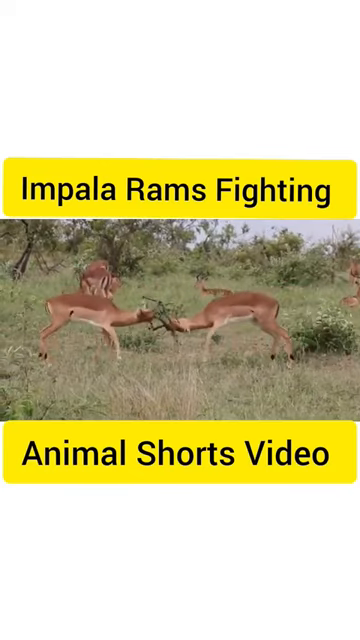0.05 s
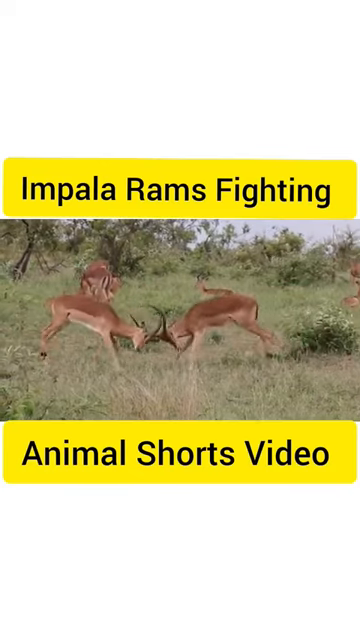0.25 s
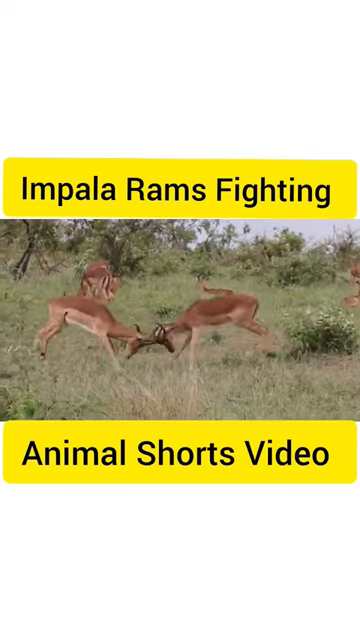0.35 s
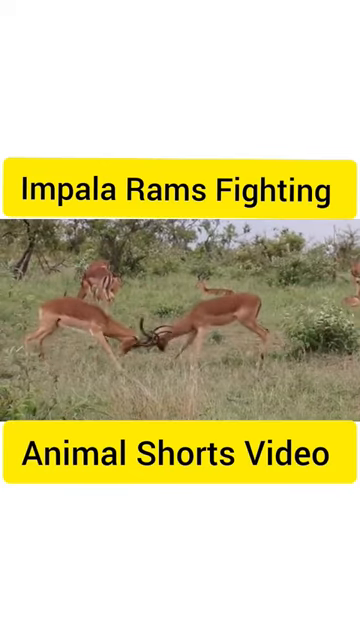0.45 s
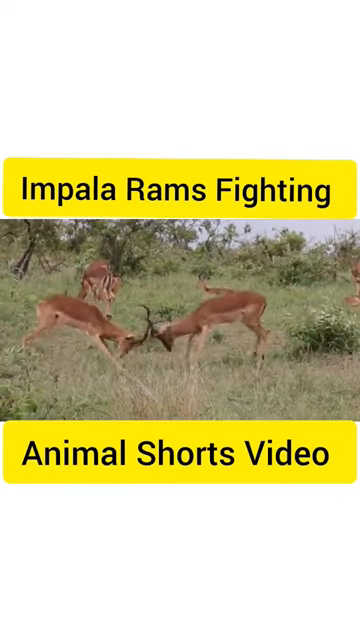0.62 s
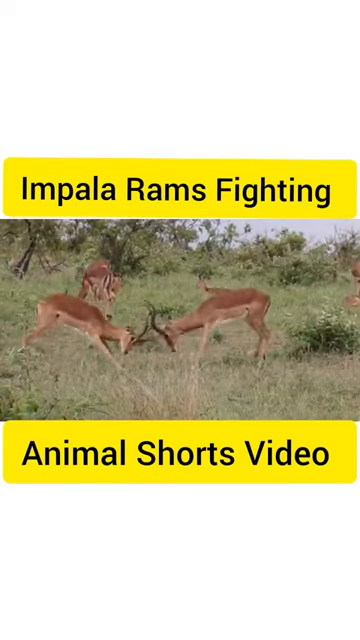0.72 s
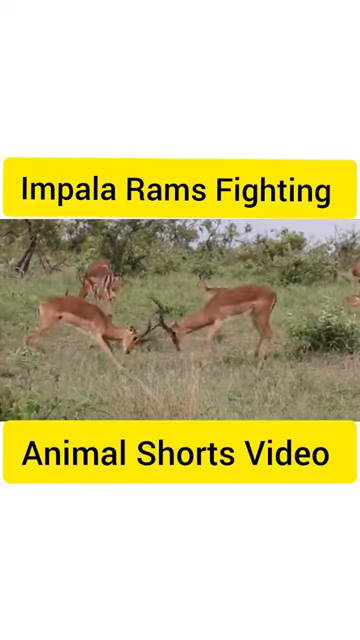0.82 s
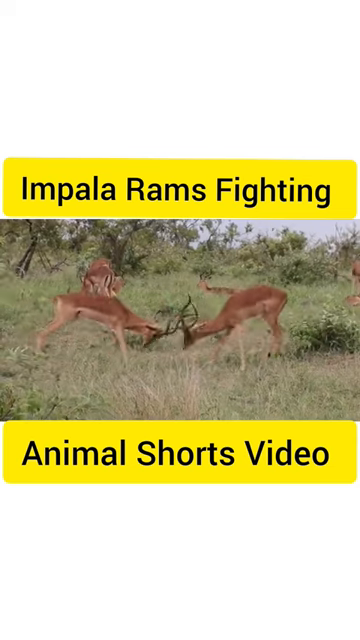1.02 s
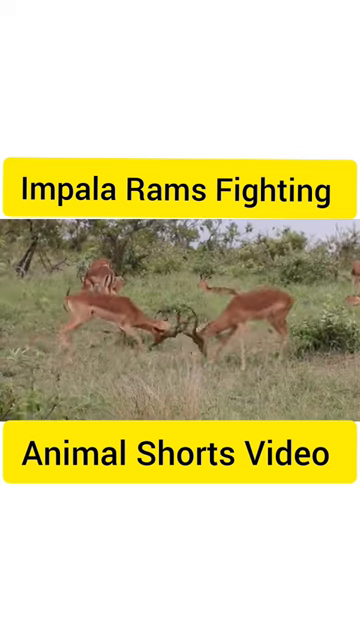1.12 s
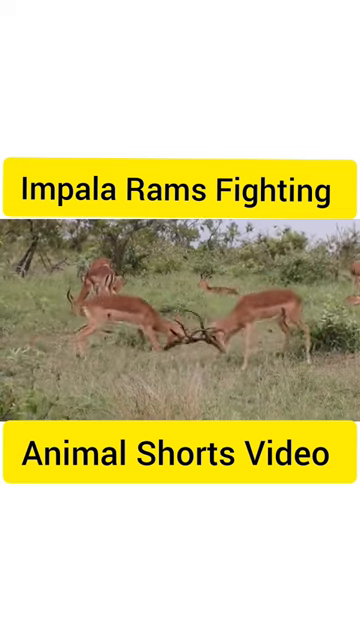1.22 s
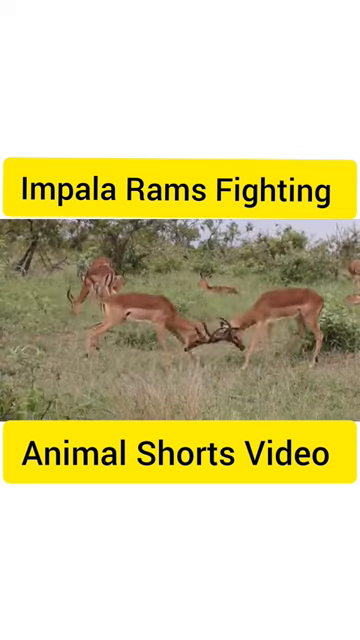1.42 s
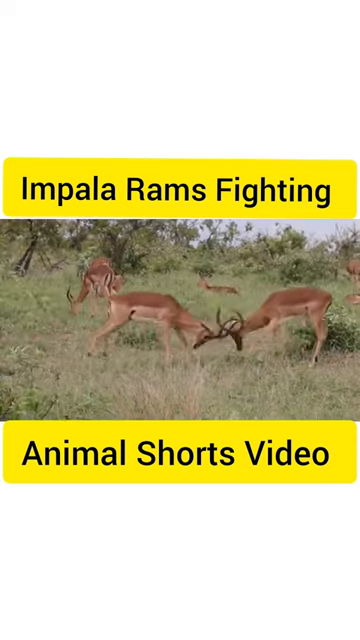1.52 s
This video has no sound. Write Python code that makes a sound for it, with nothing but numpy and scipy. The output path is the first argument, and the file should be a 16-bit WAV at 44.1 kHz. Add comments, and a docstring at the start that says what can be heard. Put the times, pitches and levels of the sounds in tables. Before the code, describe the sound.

Antelope horns clash in a sharp cluster of clacks, rattle and scrape more softly, then knock together again. Distant birds whistle and end on a high trill over thin hiss, in open grassland through a small microphone with little bass.

```python
"""A thin, wide hiss and a few distant whistles, then hard clacks: two antelope rams clash horns in grassland.
Each contact rings the horn's modes with a tiny crack and a faint low thump; then the ridged horns
rattle and scrape along each other. Hooves thud softly, far birds whistle and end on a high trill.
Grass and bushes scatter the sound. The small microphone has little bass and clips on the hardest hits."""
import sys
import numpy as np
from scipy import signal
from scipy.fft import rfft, irfft, next_fast_len
from scipy.io import wavfile
from scipy.ndimage import uniform_filter1d

SR = 44100
rng = np.random.default_rng(int(sys.argv[2]) if len(sys.argv) > 2 else 0)


def store_wav(level_fs):
    """Save 16-bit WAV to argv[1]."""
    pcm = np.round(np.clip(np.atleast_2d(level_fs), -1, 1) * 32767)
    wavfile.write(sys.argv[1], SR, pcm.T.astype(np.int16))


N = 68355

# Tone of the hiss bed. Each row: frequency in Hz, relative level in dB.
AIR_EQ = [(40, -65), (100, -45), (300, -41.5), (600, -28.5), (900, -14), (1500, -6), (2500, -6),
          (4500, -12), (8000, -17.5), (14500, -19.5), (15200, -26.5), (16200, -54)]
# Bird calls. Each row: start and length in seconds, start and end pitch in Hz, relative level in dB.
WHISTLES = [(.038, .034, 2340, 2390, -37), (.078, .027, 2300, 2370, -36), (.096, .028, 2020, 1930, -40),
            (.154, .03, 2880, 2930, -31), (.18, .012, 2950, 3300, -30), (.19, .016, 3250, 2500, -30),
            (.217, .022, 3130, 3080, -31), (.715, .01, 5400, 4800, -40), (.72, .034, 3270, 2930, -35),
            (.726, .014, 6350, 6200, -44), (.8, .032, 3520, 3150, -34), (1.012, .048, 3450, 3290, -36),
            (1.2, .04, 2300, 2720, -40), (1.322, .032, 2920, 2990, -39), (1.402, .03, 3100, 3040, -46),
            (1.436, .05, 3080, 2980, -43)]
# Dynamics of the trill. Each entry: one chip's relative level in dB.
TRILL_LEVELS = [-40, -35, -35, -34, -33, -33, -36]
# The birds' weaker left side. Each row: frequency in Hz, left against right in dB.
BIRD_PAN = [(3500, -4.5), (5200, -1)]
# Footfalls. Each row: start in seconds, relative level in dB.
HOOF_STEPS = [(0.648, -58), (0.706, -62), (0.758, -62), (0.773, -60.5), (0.914, -58.5)]
# Tail off grass and bushes. Each row: frequency in Hz, time to fall 60 dB in seconds.
SCATTER_DECAY = [(1000, 0.067), (4000, 0.032), (10000, 0.041)]
# Fader ride of the sliding ridges. Each row: time in seconds, relative level in dB.
SCRAPE_RIDE = [(0, -74), (.19, -60), (.225, -50), (.25, -37.5), (0.287, -40), (0.327, -49.5), (.37, -45),
               (.44, -62.5), (.62, -54.5), (0.689, -46.5), (.78, -57), (.85, -52.5), (0.897, -42),
               (.95, -53.5), (1.1, -79), (1.242, -55.5), (1.296, -35.5), (1.346, -56), (1.4, -51),
               (1.55, -54)]
# Tone of the scrape. Each row: frequency in Hz, relative level in dB.
SCRAPE_EQ = [(700, -5.5), (1200, -0.5), (1800, -4.5), (3000, -1), (4500, -3.5), (6500, -12.5), (10000, -18)]
# Resonances of the horn. Each row: frequency in Hz, relative level in dB.
HORN_MODES = [(1100, -5.5), (1350, -6), (1750, -0.5), (2050, -31), (2350, 5.5), (2650, 5.5), (3100, 1),
              (3600, -4), (3950, 7.5), (4400, 5.5), (4800, -0.5), (5250, 5), (5900, 5.5), (6600, 2),
              (7600, -11)]
# Horn hits; each struck spot favours two rings. Each row: time in seconds, relative level in dB, lower
# and upper ring in Hz, upper over lower in dB, lift of the top modes and the crack in dB.
HORN_HITS = [(0.2083, -12, 2300, 4150, 10, 1), (0.2114, 0, 2650, 4250, 8, -2),
             (0.2135, -10, 1200, 3950, 6, -4), (0.2186, -16, 3100, 4170, 14, 2),
             (0.2204, -17, 3100, 4200, 14, 2), (0.2217, -23, 3040, 3170, 0, 1),
             (0.2257, -30, 3040, 3750, 5, 0), (0.2391, -1, 2650, 4400, -2, 9),
             (0.2431, -14, 2670, 3750, 6, 6), (0.2455, -22, 2260, 3810, -1, 1),
             (0.2527, -28, 2300, 3550, -1, -1), (0.2563, -26, 3040, 5170, 2, 3),
             (0.2588, -17, 1790, 4460, -1, 3), (0.2636, -4, 1800, 4100, 1, 0),
             (0.269, -3, 1750, 4450, 3, 1), (0.2744, 0, 2300, 3850, -4, -5),
             (0.2773, -9, 2390, 3850, -6, -9), (0.2806, -18, 2580, 3380, -3, -6),
             (0.2842, -10, 2300, 4050, -3, -6), (0.2893, -23, 2240, 3660, -4, -1),
             (0.2915, -24, 2280, 3880, -6, -5), (0.2956, -23, 2170, 3900, -3, -6),
             (0.2985, -23, 2170, 3100, -4, -8), (0.3033, -29, 2070, 4370, -8, -1),
             (0.3073, -29, 3010, 3060, 0, -4), (0.3115, -32, 2070, 3060, -4, -2),
             (0.3281, -29, 3040, 3340, 3, -2), (0.3361, -31, 3040, 3420, 5, 0),
             (0.3461, -24, 1750, 3150, 4, -8), (0.3498, -27, 2240, 3210, -2, -2),
             (0.362, -33, 2300, 4560, 1, 0), (0.3679, -32, 2300, 3340, -10, -2),
             (0.3732, -28, 1980, 4540, 3, 4), (0.3759, -32, 3040, 3250, 2, -6),
             (0.3794, -31, 2200, 4010, -4, 0), (0.4005, -33, 3040, 4090, 3, 0),
             (0.5249, -35, 2730, 3850, 3, 0), (0.6217, -37, 2540, 4500, 0, 0),
             (0.6934, -26, 2840, 4240, 0, -2), (0.8399, -35, 1830, 3060, 1, 0),
             (0.8673, -31, 3040, 3170, 2, -3), (0.8698, -34, 1350, 3060, 0, -1),
             (0.8784, -31, 3040, 4180, 2, -1), (0.8877, -32, 1350, 3060, 0, -2),
             (0.8908, -28, 2560, 4290, -3, -1), (0.8944, -26, 1350, 3800, 3, -5),
             (0.8962, -26, 2300, 3200, 0, -8), (0.9042, -30, 1770, 3060, -4, -1),
             (0.908, -32, 1920, 3810, 3, 0), (0.9103, -29, 3040, 3190, 1, -3),
             (0.9244, -24, 2540, 4400, 0, -12), (0.9397, -32, 2500, 3770, -2, 0),
             (0.9724, -30, 1780, 3100, -4, -12), (0.9738, -30, 1780, 4400, -6, -12),
             (1.2661, -35, 2110, 4650, -2, 0), (1.2698, -35, 1770, 3320, -3, -3),
             (1.2782, -17, 2480, 3100, 0, 0), (1.2858, -18, 2650, 3640, 3, -8),
             (1.2894, -25, 1350, 4200, -2, -5), (1.2933, -13, 1750, 4410, 2, 3),
             (1.2975, -18, 1650, 3650, -6, -10), (1.3041, -23, 1250, 4000, -8, -6),
             (1.3062, -27, 1700, 4030, -2, -7), (1.3139, -24, 1660, 3660, 6, -5),
             (1.3222, -29, 1750, 3850, -6, -6), (1.3261, -31, 1640, 3920, -7, -6),
             (1.3402, -34, 1740, 3400, -3, -2)]
# The rams' place in the stereo image. Each row: frequency in Hz, left over right in dB.
RAM_PAN = [(1200, -1), (2200, -6), (3300, -0.6), (4500, 2), (8000, -0.5)]


def amp(db):
    """Turns dB into gain."""
    return 10 ** (np.asarray(db) / 20)


def unit(x):
    """Scales to an rms of 1."""
    return x / np.sqrt(np.mean(x ** 2) + 1e-20)


def curve(points, hz):
    """Reads (Hz, value) points along a log frequency axis."""
    freqs, values = np.transpose(points)
    return np.interp(np.log(hz + 1), np.log(freqs + 1), values)


def eq(x, response):
    """Zero-phase EQ; response gives the gain at each frequency."""
    size = next_fast_len(N + 8192)
    return irfft(rfft(x, size) * response(np.fft.rfftfreq(size, 1 / SR)), size)[..., :N]


def add(track, start, sound):
    """Mixes a sound in at a start time in seconds."""
    part = track[round(start * SR):][:len(sound)]
    part += sound[:len(part)]


def air(level_db=-48, patch_db=-1.0):
    """The bed: wide hiss, unrelated left and right, with faint patches in time and pitch."""
    spectrum = signal.stft(rng.standard_normal((2, N + 512)), nperseg=512)[2]
    patches = uniform_filter1d(rng.standard_normal(spectrum.shape[1:]), size=6, axis=0)
    patches = unit(uniform_filter1d(patches, size=10, axis=1))
    hiss = signal.istft(spectrum * amp(patch_db * patches), nperseg=512)[1][:, :N]
    return amp(level_db) * unit(eq(hiss, lambda hz: amp(curve(AIR_EQ, hz))))


def birds(trill_start=1.4, chip_step_s=.0222, chip_s=.0055, chip_hz=5300, trim_db=-2, flutter_db=2):
    """Gliding whistles and a trill of rising chips, each reaching higher, fluttering with distance."""
    out = np.zeros(N)
    chips = [(trill_start + k * chip_step_s, chip_s, chip_hz, chip_hz + 550 + 130 * k, db)
             for k, db in enumerate(TRILL_LEVELS)]
    for start, length, start_hz, end_hz, db in WHISTLES + chips:
        progress = np.linspace(0, 1, round(length * SR))
        pitch = start_hz + (end_hz - start_hz) * progress
        swell = np.sin(np.pi * progress) ** .6
        add(out, start, amp(db) * swell * np.sin(2 * np.pi * np.cumsum(pitch) / SR))
    span = round(.003 * SR)
    flutter = unit(uniform_filter1d(uniform_filter1d(rng.standard_normal(N), span), span))
    return out * amp(trim_db + flutter_db * flutter)


def grass_scatter(x):
    """A short diffuse tail off grass and bushes, different in each ear."""
    hz, t, spectrum = signal.stft(rng.standard_normal((2, SR // 4)), SR, nperseg=128)
    decay = amp(-60 * t / curve(SCATTER_DECAY, hz)[:, None])
    tail = signal.istft(spectrum * decay, SR, nperseg=128)[1]
    return signal.fftconvolve(x[None], tail / np.linalg.norm(tail[0]), axes=1)[:, :N]


def hooves(centre_hz=425, attack_s=.00094, t60=.031):
    """Soft low thuds on the ground: a damped sine, pitched differently on each step."""
    out, t = np.zeros(N), np.arange(SR // 20) / SR
    for start, db in HOOF_STEPS:
        envelope = amp(db - 60 * t / t60) * (1 - np.exp(-t / attack_s))
        pitch = centre_hz * (1 + .11 * rng.normal())
        add(out, start, envelope * np.sin(2 * np.pi * pitch * t))
    return out


def clip_thumps(trim_db=-43, pulse_s=.001):
    """A faint low thump under each horn hit, as from the overloaded microphone: a one-way pulse."""
    out = np.zeros(N)
    for start, db, *_ in HORN_HITS:
        add(out, start, rng.choice([-1, 1]) * amp(db + trim_db) * np.hanning(round(pulse_s * SR)))
    return out


def horn_scrape(ticks_per_s=1200, spread_db=4):
    """Ridge slides over ridge: a dense grain of tiny ticks of uneven size."""
    chance, polarity, size = rng.random((N, 3)).T
    tick_db = np.minimum(-spread_db * np.log(1 - size), 3 * spread_db)
    ticks = (chance < ticks_per_s / SR) * np.sign(polarity - .5) * amp(tick_db)
    grain = unit(eq(ticks, lambda hz: amp(curve(SCRAPE_EQ, hz))))
    times, db = np.transpose(SCRAPE_RIDE)
    return amp(np.interp(np.arange(N) / SR, times, db)) * grain


def horn_clacks(favour_db=14, favour_octaves=.09, t60_cycles=34, ring_db=1, crack_db=-32, crack_t60=.005):
    """Each hit rings the horn's modes, most of all near its two favoured pitches, with a tiny crack."""
    out, t = np.zeros(N), np.arange(SR // 20) / SR
    hz, mode_db = np.transpose(HORN_MODES)[:, :, None]
    variations = rng.standard_normal((len(HORN_HITS), 2, len(HORN_MODES), 1))
    polarity = (-1) ** (np.arange(len(HORN_MODES))[:, None] // 2)  # flips every two modes
    decay = amp(-60 * t * hz / t60_cycles)
    near = lambda centre: np.exp(-.5 * (np.log2(hz / centre) / favour_octaves) ** 2)
    for (time, db, low_hz, high_hz, tilt_db, top_db), (uneven, detune) in zip(HORN_HITS, variations):
        spot_db = (favour_db - tilt_db / 2) * near(low_hz) + (favour_db + tilt_db / 2) * near(high_hz)
        gain = amp(mode_db + spot_db + top_db * (hz > 5000) + 1.5 * uneven)
        attack_s = .0004 * 2 ** (-db / 35)  # contact time doubles for a blow 35 dB softer
        rise = np.sin(np.pi / 2 * np.minimum(t / attack_s, 1)) ** 2
        tones = np.sin(2 * np.pi * hz * (1 + .015 * detune) * t)
        ring = rise * (polarity * gain * decay * tones).sum(0)
        crack = rise * amp(crack_db + top_db - 60 * t / crack_t60) * rng.standard_normal(len(t))
        add(out, time - attack_s / 2, amp(db) * (amp(ring_db) * ring / np.abs(ring).max() + crack))
    return out


def scene(low_cut_hz=940, ram_send_db=-10, bird_send_db=-7):
    """The mix: air all round, birds far right, rams near the centre with a short scatter tail."""
    pan = lambda left_db: amp([left_db / 2, -left_db / 2])
    low_cut = signal.butter(5, low_cut_hz, "high", fs=SR, output="sos")
    horns = signal.sosfilt(low_cut, horn_clacks() + horn_scrape())  # the microphone loses their bass
    rams = horns + clip_thumps() + hooves()
    calls = birds()
    foreground = eq(rams, lambda hz: pan(curve(RAM_PAN, hz))) + amp(ram_send_db) * grass_scatter(rams)
    # The birds sit so far right that the left channel gets them in opposite polarity.
    calls_left = -eq(calls, lambda hz: amp(curve(BIRD_PAN, hz)))
    background = np.array([calls_left, calls]) + amp(bird_send_db) * grass_scatter(calls)
    return foreground + background + air() * pan(-.5)[:, None]


def record(dry, ceiling=1.02, hardness=8, shelf_hz=15300, shelf_db=-14, top_hz=16450):
    """The small microphone soft-clips the loudest peaks; the top end steps down, then cuts off."""
    clipped = dry / (1 + np.abs(dry / ceiling) ** hardness) ** (1 / hardness)
    return eq(clipped, lambda hz: (hz < top_hz) * np.where(hz > shelf_hz, amp(shelf_db), 1))


dry = scene()
out = record(dry)
store_wav(out)
```